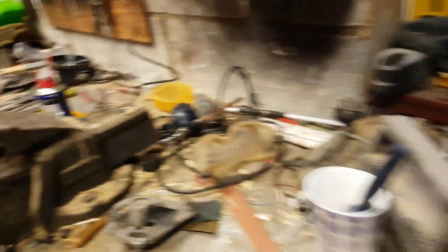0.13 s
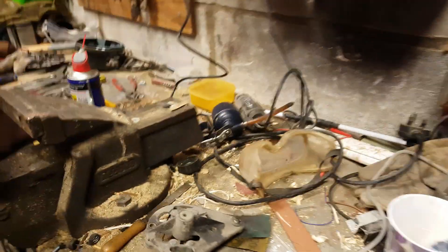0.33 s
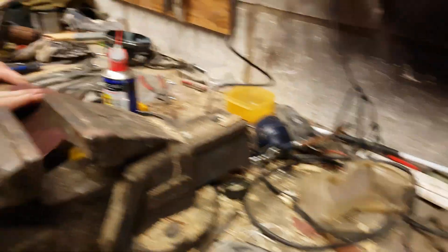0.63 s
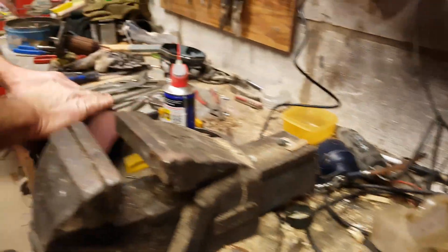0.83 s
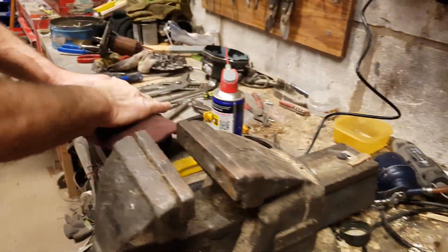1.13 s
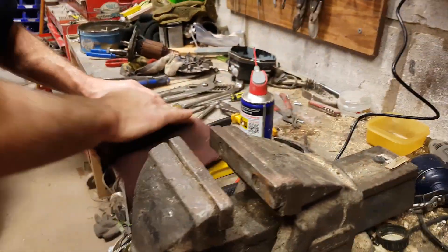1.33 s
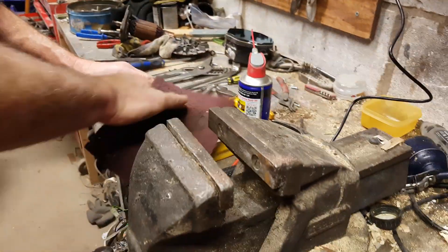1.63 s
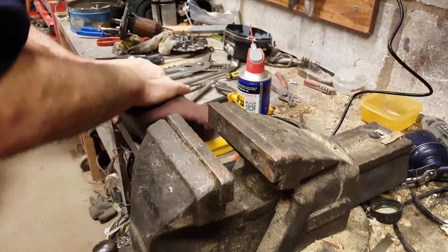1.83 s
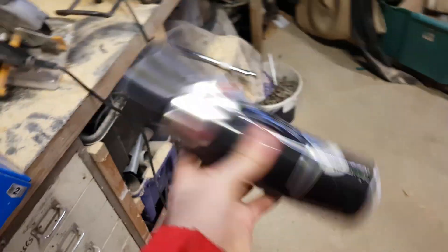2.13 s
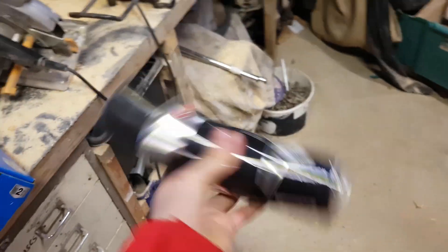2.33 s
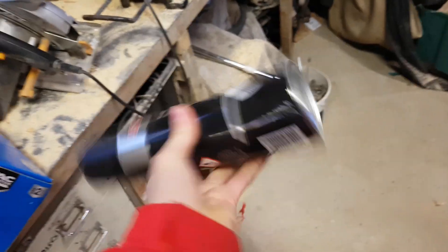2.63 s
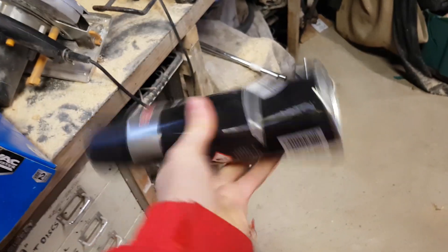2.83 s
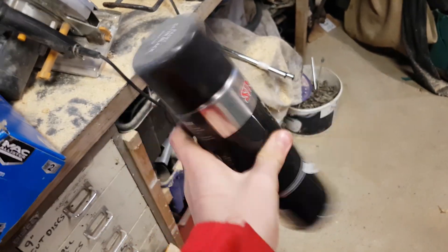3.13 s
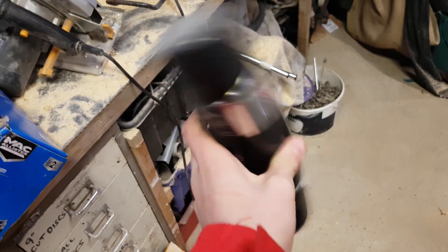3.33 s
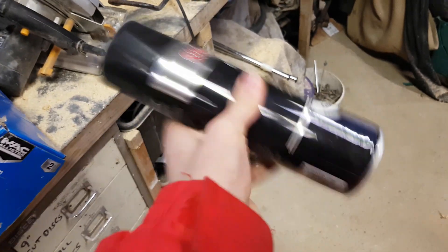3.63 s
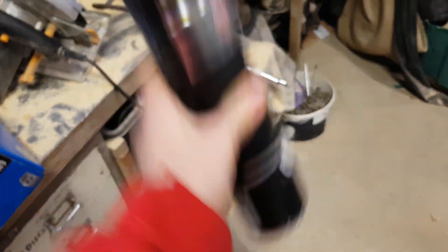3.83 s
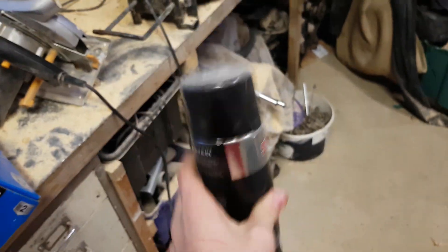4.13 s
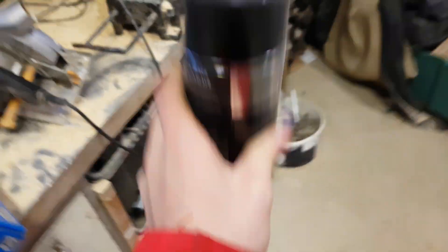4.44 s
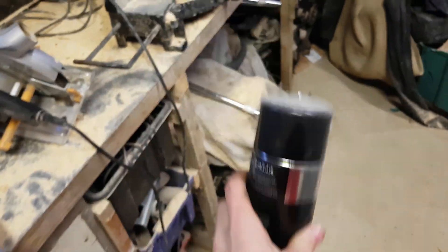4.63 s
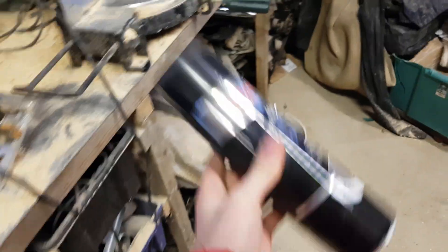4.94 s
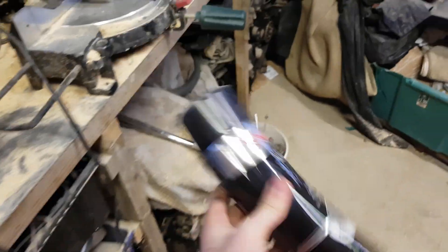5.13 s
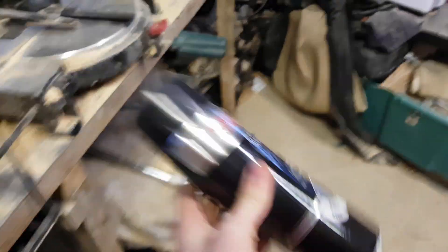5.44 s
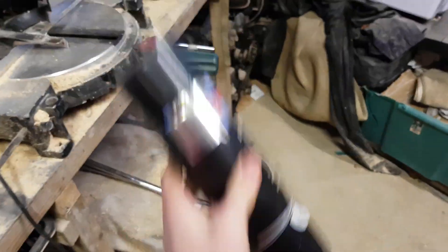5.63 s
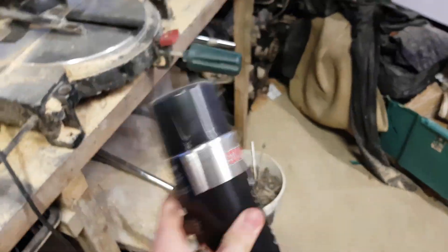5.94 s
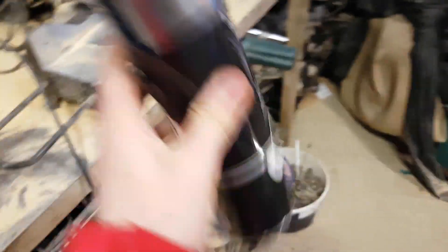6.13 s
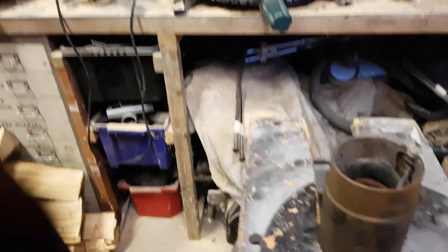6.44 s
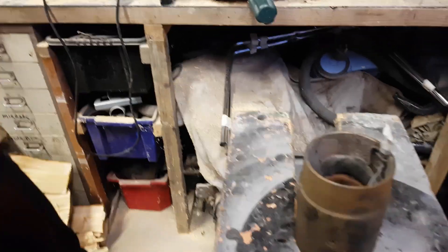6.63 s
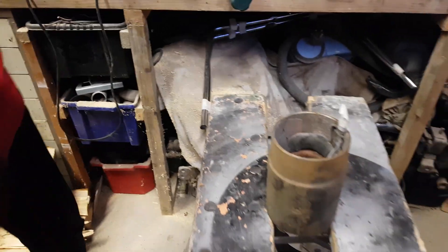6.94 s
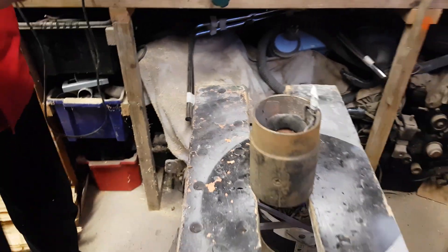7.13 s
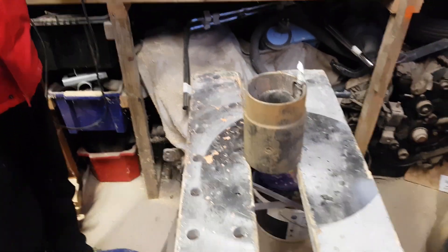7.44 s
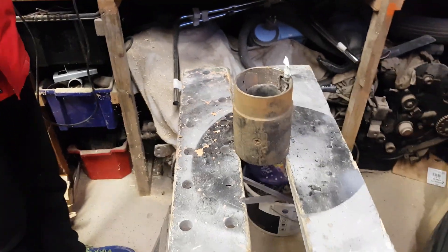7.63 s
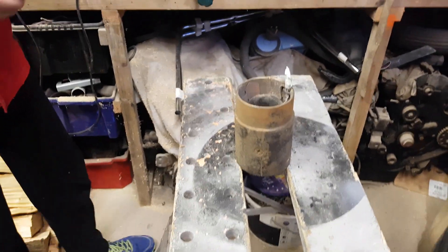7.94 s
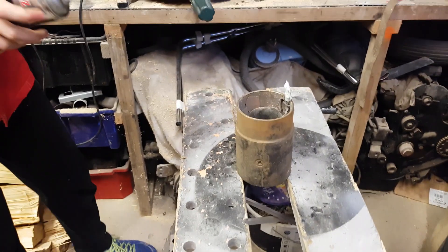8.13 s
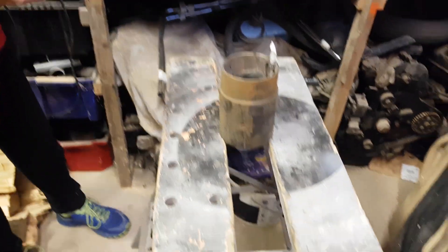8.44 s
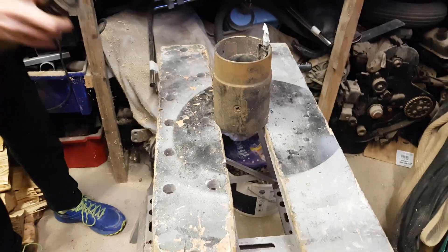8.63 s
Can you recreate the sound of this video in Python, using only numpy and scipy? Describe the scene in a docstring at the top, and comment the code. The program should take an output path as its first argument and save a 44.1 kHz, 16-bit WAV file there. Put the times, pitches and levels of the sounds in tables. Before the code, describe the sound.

Brief sanding with dull knocks, then an aerosol can is shaken hard up close, its ball rattling, and later rattles farther off.

```python
"""A workshop. First, hands sand a part on the bench amid ticks; dull knocks come now and then throughout.
After a brief silence at 2 s an aerosol can is shaken close up: its mixing ball clacks on wall and dome
through sloshing paint, puffs of air hit the microphones, and the small hard room answers every clack.
After a tiny gap at 6.2 s the can rattles farther off, shoes and cloth shuffle, and something drags."""
import sys
import numpy as np
from scipy import signal
from scipy.fft import rfft, irfft, next_fast_len
from scipy.io import wavfile
from scipy.ndimage import map_coordinates

SR = 44100
rng = np.random.default_rng(int(sys.argv[2]) if len(sys.argv) > 2 else 0)


def log_audio(samples):
    """Write samples as a 16-bit WAV file to the path given in sys.argv[1]."""
    # one column per channel
    frames = np.atleast_2d(samples).T
    # limit to full scale, then quantise
    limited = np.clip(frames, -1, 1)
    pcm = np.round(limited * 32767).astype(np.int16)
    wavfile.write(sys.argv[1], SR, pcm)


N = 387638
TIME = np.arange(N) / SR

def amp(db):
    return 10 ** (np.asarray(db) / 20)

def curves(rows):
    """A dB fader per column, silent outside the rows."""
    s, *columns = np.transpose(rows)
    return [np.interp(TIME, s, db, left=-150, right=-150) for db in columns]

def filtered(x, response):
    size = next_fast_len(N + 8192)
    return irfft(rfft(x, size) * response(np.fft.rfftfreq(size, 1 / SR)), size)[..., :N]

def rush(spectrum, alike, grain_db=0, grain_hz=300):
    """Grainy stereo noise of rms 1; alike is the left-right likeness."""
    knots = rng.standard_normal(N // 8)
    grain = amp(grain_db * map_coordinates(knots, [TIME * grain_hz], order=1))
    hz, db = np.transpose(spectrum)
    white = rng.standard_normal((2, N))
    mid, side = filtered(grain * white, lambda f: amp(np.interp(np.log1p(f), np.log1p(hz), db)))
    width = np.arccos(alike) / 2
    noise = np.cos(width) * mid + np.sin(width) * np.array([side, -side])
    return noise / np.sqrt(np.mean(noise ** 2))

def dying(s, db, t60, rise):
    """Envelope of hits at times s; their powers add."""
    power = np.bincount(np.round(s * SR).astype(int), amp(db) ** 2, N)[:N]
    fall, swell = amp(-120 / (t60 * SR)), np.exp(-1 / (rise * SR))
    return np.sqrt(np.abs(signal.lfilter([1 - swell], np.poly([fall, swell]), power)))

def struck(modes, peak_db, t, scatter_db, detune, apart):
    """One ring per blow and ear; each blow varies the modes' strength and pitch."""
    hz, db, t60 = np.transpose(modes)[:, None, None, :, None]
    blow = rng.standard_normal((len(peak_db), 1, len(modes), 2))
    ear = rng.standard_normal((len(peak_db), 2, len(modes), 1))
    phase = 2 * np.pi * hz * (1 + detune * blow[..., 1:]) * t + apart * ear
    decay = amp(db + scatter_db * blow[..., :1] - 60 * t / t60)
    ring = (decay * np.sin(phase)).sum(axis=2) * (1 - np.exp(-t / 0.00033))
    return amp(peak_db)[:, None, None] * ring / np.abs(ring).max(axis=(1, 2), keepdims=True)

def laid(rings, s, lead, pan_db=-1.5):
    """Rings placed at times s, the left ear ahead by lead samples."""
    rings = rings * amp(np.outer(pan_db, [.5, -.5]))[..., None]
    start = np.round(s[:, None] * SR + np.outer(lead, [-.5, .5])).astype(int)
    index = start[..., None] + np.arange(rings.shape[-1])
    return np.array([np.bincount(index[:, k].ravel(), rings[:, k].ravel(), N)[:N] for k in range(2)])

def thin(x):
    """These light hits carry little bass."""
    return signal.sosfilt(signal.butter(3, 331, "high", fs=SR, output="sos"), x)

def hush():
    """Faint room hiss, coloured like the paint."""
    return amp(-60) * rush(PAINT_TONE, 0.04)

# The drag's fader. Each row: time in seconds, level in dB.
DRAG_LEVEL = [(8.65, -63), (8.654, -36), (8.68, -41), (8.76, -42.5), (8.78, -29), (8.79, -29)]
# Its colour. Each row, as in every _TONE table: frequency in Hz, relative density in dB.
DRAG_TONE = [(88, -49), (150, -24), (385, -5), (435, -3), (1670, -6), (3500, -22), (4210, -22), (6000, -29),
             (7800, -63), (13200, -120)]
def drag():
    """Something is dragged: a short, dull scrape."""
    return amp(curves(DRAG_LEVEL)[0]) * rush(DRAG_TONE, 0.65, grain_db=1.5, grain_hz=202)

# Tick cues. Each row: start in seconds, level in dB.
TICK_CUES = [(.338, -34), (.611, -36), (.734, -34), (1.347, -33)]
# A dry tick. Each row, as in every _MODES table: pitch in Hz, relative level in dB, t60 in seconds.
TICK_MODES = [(720, -1, 0.013), (1200, 1, .01), (1900, -1, 0.0087)]
def ticks():
    """Small things tick on the bench."""
    s, db = np.transpose(TICK_CUES)
    t = np.arange(SR // 50) / SR
    rings = struck(TICK_MODES, db, t, scatter_db=6, detune=0.039, apart=0.33)
    return thin(laid(rings, s, lead=5))

# Knock and thump cues. Each row: start in seconds, ring level in dB, boom level in dB.
KNOCK_CUES = [(0.096, -33.5, -40), (0.471, -38.5, -39.5), (0.799, -14.5, -33), (1.137, -26, -36.5),
              (1.488, -60, -56), (1.876, -21.5, -37), (3.865, -44, -44), (4.04, -48, -41.5),
              (4.956, -16.5, -40), (5.925, -35, -41.5), (6.799, -27, -54), (7.192, -35.5, -51),
              (8.592, -52, -84)]
# Their hollow ring, rattle and low end.
KNOCK_MODES = [(297.4, -12.5, 0.27), (425.4, -4, 0.14), (489, -3.5, 0.24), (510, -16.5, 0.2),
               (673, -2.5, 0.087), (868, -10.5, 0.11)]
RATTLE_TONE = [(130, -51), (220, -7), (488, -2), (879, -14), (989, -14.5), (1280, -14.5), (5000, -31),
               (6500, -51), (11000, -120)]
BOOM_TONE = [(24, -36), (40, -25), (59, 2), (146, 7), (260, 1), (340, -30), (570, -120)]
def knocks():
    """Dull knocks and low thumps: a hollow ring and rattle over a boom."""
    s, ring_db, boom_db = np.transpose(KNOCK_CUES)
    t = np.arange(SR // 5) / SR
    rings = struck(KNOCK_MODES, ring_db, t, scatter_db=4, detune=0.021, apart=0.38)
    rings *= 1 - np.exp(-t / 0.00182)
    rattle = dying(s, ring_db - 5, t60=0.21, rise=0.0035)
    rattle = rattle * rush(RATTLE_TONE, 0.41, grain_db=3, grain_hz=70.6)
    boom = dying(s, boom_db, t60=0.23, rise=0.0053) * rush(BOOM_TONE, 0.97)
    return laid(rings, s, lead=5) + rattle + boom

# Turns of the sanding hand. Each row: start in seconds, grit level in dB.
STROKE_CUES = [(-.06, -46.5), (.092, -43.5), (.3, -46), (.468, -49.5), (.635, -45), (0.783, -46.5),
               (.98, -44.5), (1.128, -49), (1.32, -44), (1.49, -52), (1.69, -46.5), (1.856, -48.5),
               (2.02, -47)]
# The paper's bright hiss and the bench's body under it.
GRIT_TONE = [(530, -53), (900, -11), (1330, -11.5), (1940, -3.5), (4330, -6.5), (7760, -10), (8870, -21),
             (15200, -17), (15900, -35), (16500, -56)]
DRONE_TONE = [(24, -62), (40, -2), (145, -10), (339, -6), (671, -3.5), (818, -6), (1500, -16), (1950, -37),
              (3300, -120)]
def sanding():
    """Grit hisses with the hand's speed and sets the bench droning."""
    t = TIME[:2 * SR]
    rest_s, strokes = 0.0067, 0
    for (start, db), (turn, _) in zip(STROKE_CUES, STROKE_CUES[1:]):
        progress = np.clip((t - start) / (turn - rest_s - start), 0, 1)
        strokes += amp(db) * np.sin(np.pi * progress) ** 1.1
    press = amp(-54 - 8.2 * t)  # the paper never quite rests
    grit, drone = np.pad([strokes + press, amp(-16.5 - 2 * t) * strokes + press], [(0, 0), (0, N - len(t))])
    grit = grit * amp([[-1], [1]]) * rush(GRIT_TONE, 0.036, grain_db=1.5, grain_hz=604)
    return grit + drone * rush(DRONE_TONE, 0.79, grain_db=2, grain_hz=59.7)

# Movement faders. Each row: time in seconds, paint level in dB, shuffle level in dB.
MOVEMENT = [(2.0, -45, -51), (2.13, -35, -52.5), (2.49, -44, -58.5), (3.3, -43, -57.5),
            (3.51, -36.5, -53.5), (4.59, -41, -54.5), (4.93, -47, -49), (5.97, -43, -59.5),
            (6.14, -57, -56.5), (6.41, -55, -45.5), (6.6, -49.5, -52.5), (7.39, -84, -67),
            (7.77, -42.5, -55.5), (8.05, -58.5, -71.5), (8.66, -52, -59.5), (8.79, -44, -53)]
# Muffled footwork and wet, bright paint.
CLOTH_TONE = [(35, -50), (60, -13), (149, -5), (454, -1), (695, 2), (1490, -27), (1800, -26), (2000, -39),
              (2600, -61), (4400, -120)]
PAINT_TONE = [(410, -27), (700, -2), (1270, 4.5), (1550, 4.5), (4060, 1.5), (5430, -5.5), (7560, -4),
              (9220, -18.5), (12500, -11), (15200, -18), (16500, -42)]
def shuffle():
    """Cloth and shoes rub softly."""
    return amp(curves(MOVEMENT)[1]) * rush(CLOTH_TONE, 0.72, grain_db=4, grain_hz=91.7)

def slosh():
    """Paint washes inside the can in spits."""
    level = amp(curves(MOVEMENT)[0] + [[-1.2], [1.2]])
    return level * rush(PAINT_TONE, 0.017, grain_db=6, grain_hz=148.1)

# Air pops. Each row: start in seconds, peak in dB, time scale of the push in seconds.
PUFF_CUES = [(2.083, -5, 0.0022), (4.277, -18.5, 0.00061), (4.621, -35, 0.0015), (5.67, -41, 0.004),
             (6.129, -20, 0.00066), (6.35, -29.5, 0.0033), (6.44, -21, 0.0012), (6.632, -7, 0.0015),
             (7.638, -18, 0.00092)]
def puffs():
    """Air dents the microphone membrane facing the can, which swings back once."""
    out, t = np.zeros((2, N)), np.arange(SR // 8) / SR
    for s, db, push in PUFF_CUES:
        age = t / push
        dent = age * (1.5 - age) * np.exp(-1.4 * age)
        ear = int(s < SILENCES[1][0])  # right until the second gap, then left
        out[ear, round(s * SR):][:len(t)] -= amp(db) * dent / dent.max()
    return out

# Low, mid and top bands. Each row: wash t60 in seconds, wash and crack offsets in dB, a tone table.
ROOM_BANDS = [ (0.2, -0.5, -5.5, [(180, -58), (300, -7.5), (583, -6), (779, -2), (935, -4.5), (2250, 1.5),
              (3000, -5.5), (3900, -49), (6600, -120)]), (0.18, -0.5, -7, [(1760, -19.5), (3000, -8),
              (4380, -4), (5240, -9.5), (7650, -8.5), (8150, -11), (8800, -25), (11400, -68),
              (19400, -120)]), (0.17, -14, -16.5, [(5180, -31), (8800, -34.5), (9420, -9.5), (13400, -2),
              (15600, -13), (16500, -14.5)])]
# The top band shifts as the can turns. Each row: time in seconds, gain in dB.
BRIGHTNESS = [(2, -0.5), (2.6, 1.5), (4.8, 0.5), (5.2, -4), (6.1, -1), (6.5, 3), (7.6, 2.5), (8.3, 1),
              (8.79, -4)]
def room_answer(s, wall_db, dome_db):
    """Each clack cracks and the room returns a short wash."""
    when, _, side_db, send_db = np.transpose(CAN_PATH)
    softness_db = -10 - np.maximum(wall_db, dome_db)
    wet_db = np.interp(s, when, send_db) + 0.05 * softness_db  # soft touches sound wetter
    top_db = dome_db + np.interp(s, *np.transpose(BRIGHTNESS))
    pan = amp(0.17 * np.outer([1, -1], np.interp(TIME, when, side_db)))
    out = 0
    for (t60, wash_db, crack_db, tone), db in zip(ROOM_BANDS, [wall_db, dome_db, top_db]):
        wash = dying(s + .002, db + wet_db + wash_db, t60, rise=.0015)
        crack = dying(s, db + crack_db, t60=0.011, rise=.0001)
        out += pan * np.hypot(wash, crack) * rush(tone, 0.22, grain_db=3.5, grain_hz=392)
    return out

# Tails of gas column, wall and dome. Each row: pitch in Hz, offset from the hit in dB, t60 in seconds.
CAN_TAILS = [(777.4, 2.5, 0.068), (2280, -19.5, 0.12), (4380, -22, 0.062)]
def hollow_ring():
    """The gas column sings after lengthwise blows; one wall and one dome mode ring on too."""
    s, wall_db, dome_db, column_db = np.transpose(BALL_HITS)
    t = np.arange(SR // 14) / SR
    wall_db, dome_db = [wall_db, dome_db] + rng.normal(0, 4, (len(s), 2)).T  # blows feed them unevenly
    rings = sum(struck([mode], db + mode[1], t, scatter_db=0, detune=0.01, apart=0.49)
                for mode, db in zip(CAN_TAILS, [column_db, wall_db, dome_db]))
    return laid(rings * (1 - np.exp(-t / 0.00061)), s, lead=2)

# The mixing ball's hits. Each row: start in seconds, then wall, dome and gas column levels in dB.
BALL_HITS = [(2.0151, -17, -16.5, -56), (2.0365, -16.5, -18.5, -56), (2.0827, -14.5, -4.5, -37),
             (2.1582, -20.5, -10.5, -52), (2.1758, -17.5, -15.5, -38), (2.292, -28, -19.5, -46),
             (2.3309, -50, -20.5, -58), (2.351, -25, -17.5, -56), (2.399, -20, -22.5, -39),
             (2.463, -18, -27, -56), (2.479, -21.5, -11.5, -58), (2.5172, -24, -20, -54),
             (2.5607, -20, -14, -37.5), (2.5859, -20.5, -16, -38), (2.619, -25, -26, -56),
             (2.6356, -26.5, -22.5, -56), (2.698, -20, -24, -37), (2.7056, -16, -9.5, -51),
             (2.726, -20.5, -20, -45), (2.7442, -19, -38, -59), (2.7774, -14.5, -13.5, -38),
             (2.8, -17, -12, -41), (2.8257, -23, -21, -46), (2.838, -14, -19.5, -52),
             (2.896, -18, -8.5, -35), (2.9142, -19, -12.5, -31.5), (2.9295, -12, -19, -53),
             (2.9383, -19.5, -28, -55), (2.9705, -17.5, -12, -52), (2.9873, -11, -12, -33),
             (3.0234, -14.5, -21.5, -52), (3.0383, -16, -21.5, -56), (3.087, -21, -10.5, -39),
             (3.1117, -12.5, -10.5, -37), (3.1203, -22, -19, -44), (3.1366, -17, -22, -34),
             (3.1474, -13, -13, -35), (3.1946, -12.5, -9, -36), (3.2241, -11.5, -12, -45),
             (3.2709, -17, -18.5, -59), (3.323, -18, -20, -38), (3.3338, -12, -8, -28),
             (3.3449, -11, -10.5, -46), (3.3716, -13, -11.5, -38), (3.3854, -12.5, -10, -40),
             (3.4075, -11.5, -7, -53), (3.4289, -8.5, -5, -46), (3.4616, -12.5, -15, -52),
             (3.474, -11, -13, -56), (3.5, -12, -8.5, -40), (3.5138, -11.5, -19, -52),
             (3.5239, -15, -10, -47), (3.5443, -16.5, -9.5, -27), (3.5606, -12.5, -15, -50),
             (3.5749, -12, -12.5, -37), (3.5841, -13, -16, -42), (3.5987, -6, -6.5, -53),
             (3.6082, -27, -10.5, -56), (3.6286, -12.5, -7, -47), (3.6644, -19.5, -14.5, -41),
             (3.7018, -26, -15, -35), (3.7127, -11, -8, -38), (3.7426, -16.5, -15.5, -54),
             (3.7618, -17, -22, -56), (3.7887, -16, -18.5, -59), (3.8392, -9, -12, -56),
             (3.8847, -11, -17, -33), (3.8927, -21, -6.5, -29.5), (3.9237, -10.5, -11, -49),
             (3.9533, -11.5, -7.5, -48), (3.9845, -18, -13, -43), (4.0602, -21, -3.5, -42),
             (4.0784, -13, -8.5, -59.5), (4.0962, -17, -19, -38), (4.1085, -16, -20.5, -56),
             (4.1513, -14.5, -7.5, -25.5), (4.1954, -21, -10.5, -33.5), (4.2753, -29, -10, -34),
             (4.34, -34, -22, -44), (4.3565, -11.5, -7, -36), (4.4078, -21, -14, -69),
             (4.455, -16, -23, -37), (4.5464, -36, -11, -38), (4.62, -25, -17, -28),
             (4.7065, -19.5, -11.5, -40), (4.7723, -23, -28, -58), (4.791, -26, -5.5, -37),
             (4.8044, -13.5, -16, -56), (4.8557, -16.5, -23, -57), (4.882, -16, -28, -56),
             (4.9011, -22.5, -27, -56), (4.9581, -18, -11, -43), (5.074, -24.5, -9.5, -51),
             (5.117, -12.5, -21, -59), (5.1449, -13.5, -25, -56), (5.2122, -18, -10.5, -39),
             (5.2389, -14, -11.5, -61), (5.2574, -12, -19, -55), (5.274, -19.5, -30, -56),
             (5.3501, -31, -3, -43), (5.3727, -17.5, -32, -44), (5.391, -19, -37, -48),
             (5.4808, -17, -10, -42), (5.4957, -14, -10.5, -43), (5.5223, -18, -23, -56),
             (5.6001, -29, -35, -52), (5.6793, -23, -22, -60), (5.7255, -18, -8, -36),
             (5.765, -18, -8.5, -31.5), (5.818, -26, -23, -49), (5.8598, -16.5, -19.5, -63),
             (5.8792, -16.5, -10, -49), (5.9038, -25, -3, -54), (5.918, -9, -30, -53),
             (5.998, -13, -7, -37), (6.0116, -17, -17, -51), (6.04, -25.5, -24.5, -56),
             (6.1278, -20.5, -9.5, -56), (6.3466, -38, -22, -58), (6.3813, -41, -27.5, -53),
             (6.419, -38, -18, -54), (6.4402, -37, -8.5, -46), (6.455, -41, -24, -52),
             (6.4633, -33, -10, -54), (6.4726, -41, -12, -53), (6.5094, -40, -22, -55),
             (6.6231, -20, -13.5, -40), (6.6326, -6, -0.5, -51), (6.6804, -15, -13.5, -56),
             (6.7176, -21, -23.5, -56), (6.7425, -24, -23.5, -58), (6.7996, -16, -17, -16.5),
             (6.8125, -39, -19.5, -40), (6.8455, -24, -9.5, -36), (6.8696, -24, -18.5, -41),
             (6.902, -23, -27, -56), (6.9903, -29, -32, -56), (7.0087, -29, -24, -48),
             (7.095, -28, -29, -52), (7.1617, -33, -30, -56), (7.189, -31, -24, -55),
             (7.2304, -41, -34, -61), (7.272, -37, -40, -61), (7.2859, -44, -18, -56),
             (7.3337, -25, -30, -51), (7.3803, -27, -48, -41), (7.4153, -34, -34.5, -50),
             (7.534, -24, -24, -52), (7.5574, -21, -13.5, -53), (7.5736, -19, -16.5, -55),
             (7.638, -18, -3.5, -54), (7.6515, -40, -9.5, -59), (7.7064, -25, -21, -53),
             (7.8476, -38, -37, -54), (7.8878, -28, -21, -57), (8.0193, -35.5, -29, -57),
             (8.1408, -60, -40, -65), (8.1776, -36, -28, -56), (8.2924, -31, -31.5, -61),
             (8.3381, -39, -34.5, -56), (8.3737, -43, -31, -62), (8.4542, -41, -35.5, -67),
             (8.5408, -57, -33, -67)]
def ball_blows():
    """Every hit and its light rebound: times, wall and dome levels."""
    s, wall_db, dome_db, _ = np.transpose(BALL_HITS)
    delay, size, tone = rng.uniform(size=(len(s), 3)).T
    rebound_s = s + 0.012 + 0.038 * delay
    rebound_db = np.maximum(wall_db, dome_db) - 27 + 20 * size
    return (np.r_[s, rebound_s], np.r_[wall_db, rebound_db - 4 * tone],
            np.r_[dome_db, rebound_db - 12 * (1 - tone)])

# The can's place. Each row: time in seconds, left lead in samples, left over right in dB, room send in dB.
CAN_PATH = [(2, 1.98, -9.5, -21.5), (4, 2.07, -4.7, -20), (6.19, 2.56, -6, -21.5), (6.2, 11.8, 7, -15),
            (6.75, 13.3, 1, -17), (6.95, 11.6, -1.5, -14.5), (8.79, 14.2, -1.5, -14)]
# The paint-damped wall and the brighter dome.
WALL_MODES = [(1247, 2.5, 0.0083), (1740, 5.5, 0.0091), (1949, 4.5, 0.0082), (2110, 2.5, 0.012)]
DOME_MODES = [(3830, -6, 0.0078), (4315, -3, 0.0078), (5306, -4.5, 0.0054), (6210, -10, 0.009),
              (7600, -7, 0.0086)]
def clacks(s, wall_db, dome_db):
    """The ball strikes short rings from wall and dome."""
    when, lead, side_db, _ = np.transpose(CAN_PATH)
    pan_db = np.interp(s, when, side_db) + rng.normal(0, 1.2, len(s))
    t = np.arange(SR // 60) / SR
    wall = struck(WALL_MODES, wall_db, t, scatter_db=7.5, detune=0.022, apart=0.5)
    dome = struck(DOME_MODES, dome_db, t, scatter_db=7, detune=0.034, apart=0.66)
    return laid(wall + dome, s, np.interp(s, when, lead), pan_db)

def scene():
    """All sources over the hush."""
    bed, blows = hush(), ball_blows()
    can = thin(clacks(*blows) + room_answer(*blows) + hollow_ring())
    return bed + can + slosh() + drag() + shuffle() + sanding() + ticks() + knocks() + puffs()

# Silent gaps. Each row: start and end in seconds.
SILENCES = [(1.934, 2.003), (6.194, 6.203)]
def record(dry):
    """Bass cut, soft clip, two silent gaps, steep top cut."""
    x = signal.sosfilt(signal.butter(2, 55, "high", fs=SR, output="sos"), dry)
    x = x / (1 + np.abs(x) ** 8) ** (1 / 8)
    for start, end in SILENCES:
        x *= np.clip(np.maximum(start - TIME, TIME - end) / .002, 0, 1)
    return filtered(x, lambda hz: 1 / (1 + (hz / 16100) ** 120))

dry = scene()
out = record(dry)
log_audio(out)
```